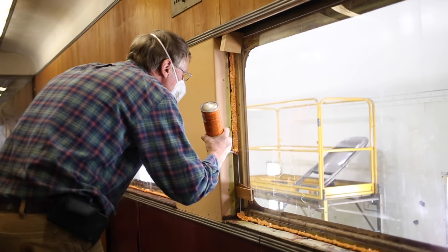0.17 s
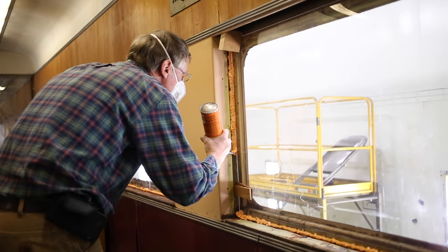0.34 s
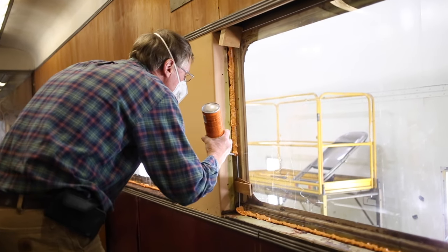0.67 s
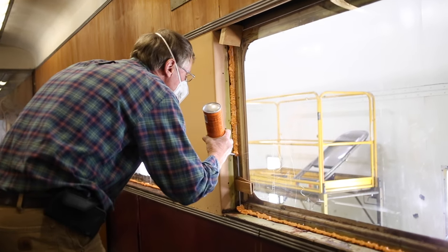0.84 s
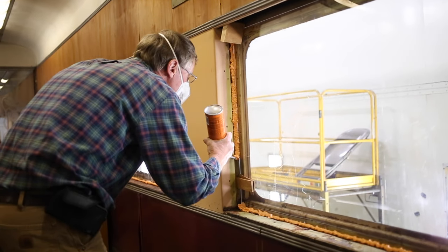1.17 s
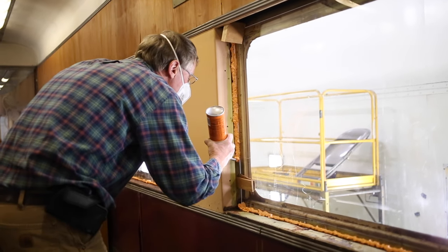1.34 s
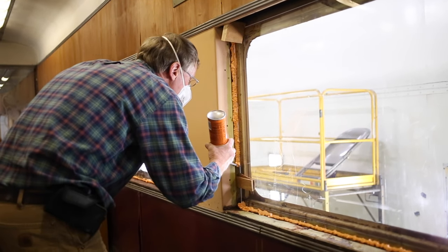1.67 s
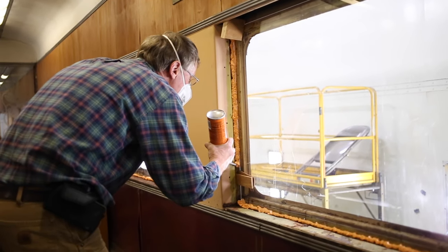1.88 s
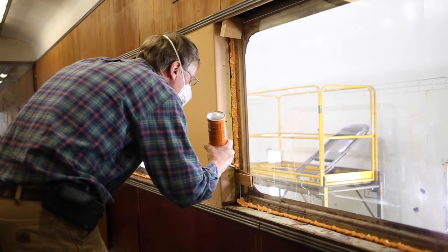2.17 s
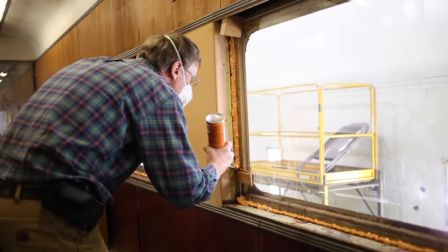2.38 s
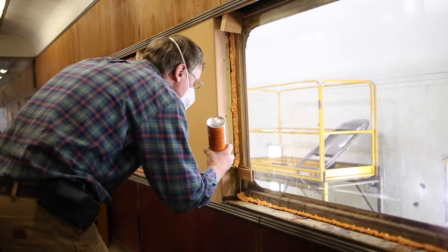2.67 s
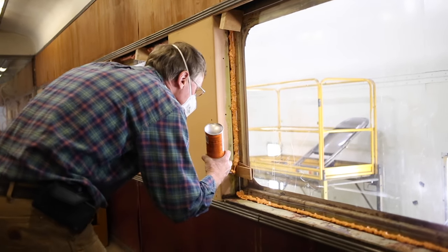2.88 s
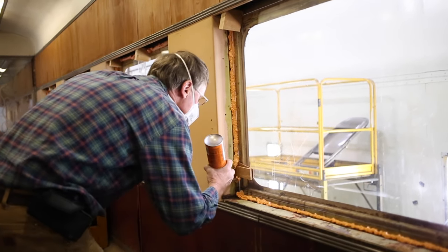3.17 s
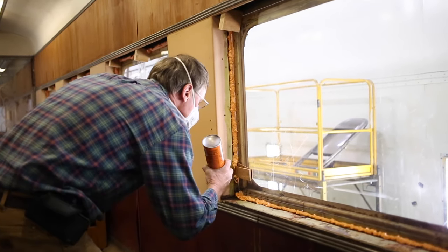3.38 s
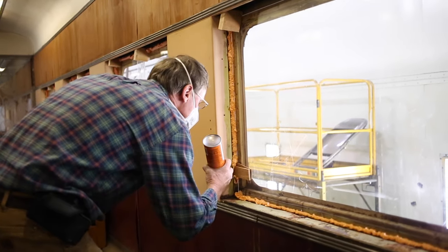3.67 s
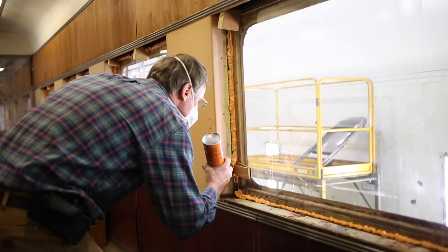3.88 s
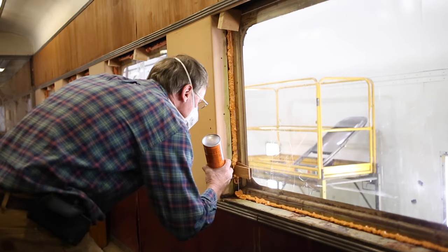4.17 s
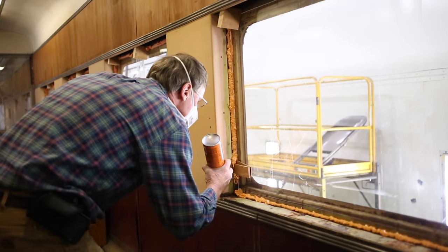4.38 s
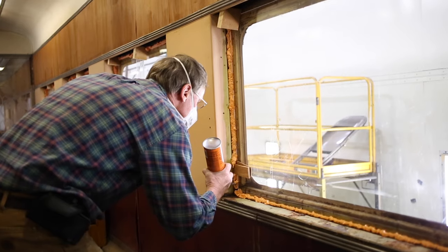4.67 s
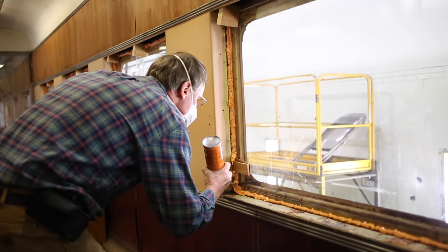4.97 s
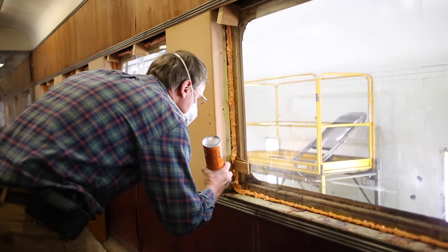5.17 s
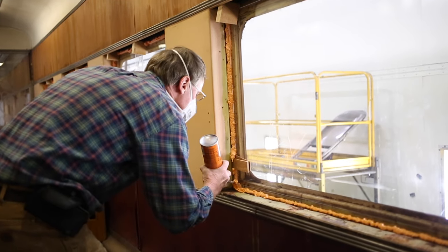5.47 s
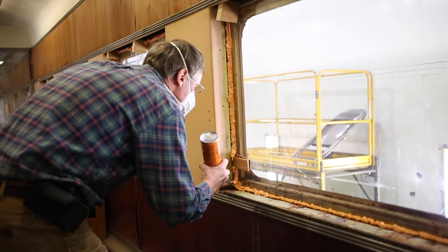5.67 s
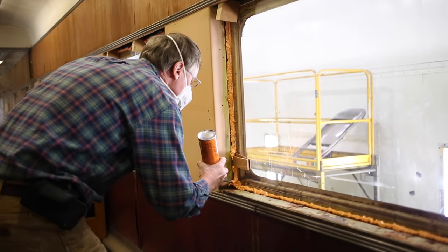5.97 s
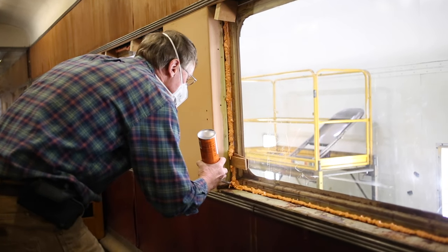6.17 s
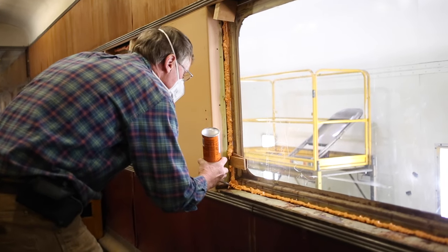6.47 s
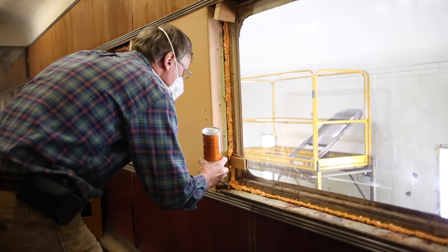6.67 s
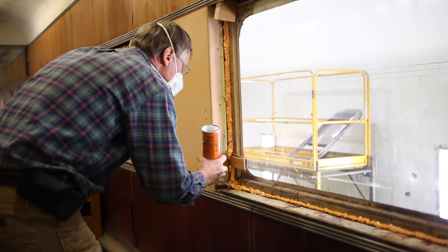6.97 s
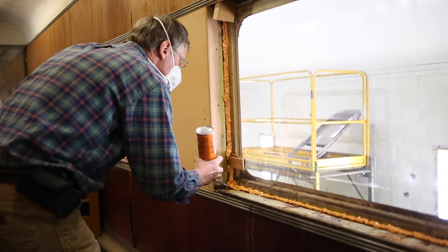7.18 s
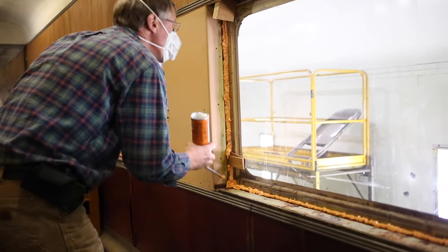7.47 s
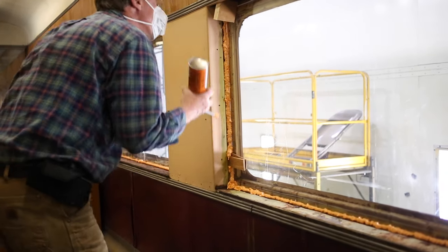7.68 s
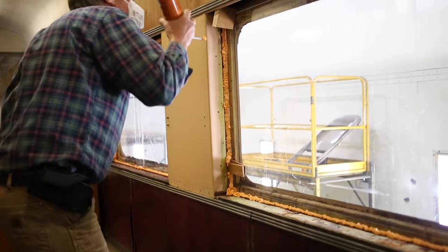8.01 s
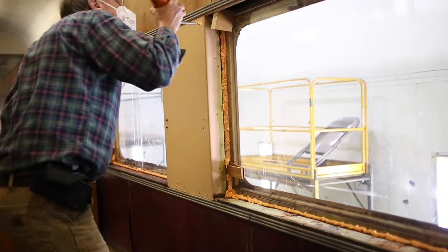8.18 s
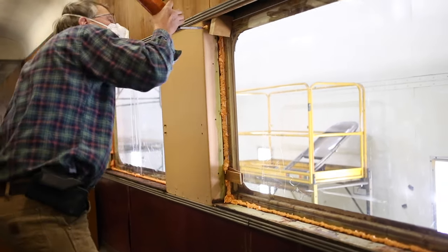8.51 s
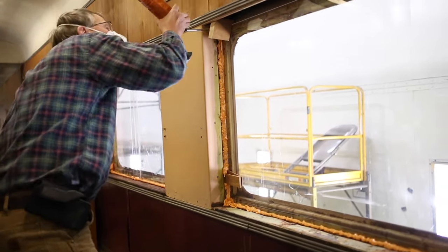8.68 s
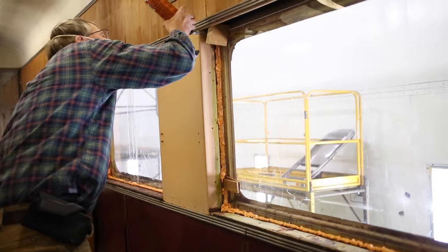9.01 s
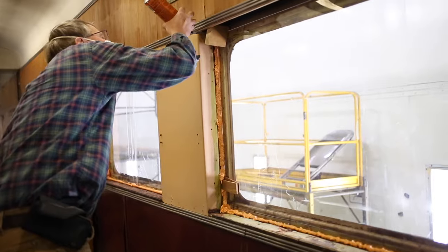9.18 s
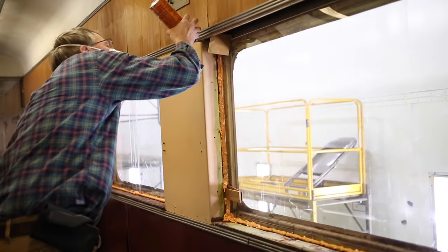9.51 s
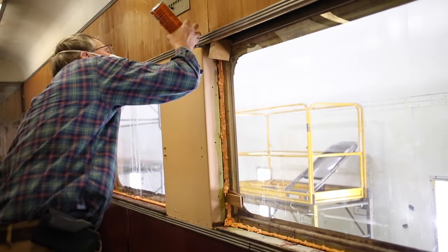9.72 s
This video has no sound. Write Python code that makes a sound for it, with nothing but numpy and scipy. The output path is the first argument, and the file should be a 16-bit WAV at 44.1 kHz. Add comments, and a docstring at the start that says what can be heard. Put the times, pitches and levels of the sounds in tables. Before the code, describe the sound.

An aerosol can squeezes out fizzing, squelching foam that turns to duller plops, then a sleeve rustles over workshop ventilation.

```python
"""Wet, sizzling foam sputters from an aerosol can into the gap beside a window, in a wood-panelled cabin.
Gas pockets burst at the straw and ring the gap, duller as the straw moves down, while propellant fizzes
and squeaks through pinholes. The nozzle spits in short spurts, big pockets plop, the can knocks lightly,
a sleeve rustles and the valve cracks open. Behind it all, the ventilation of the workshop around the
cabin hisses, hums and whines."""
import sys
import numpy as np
from scipy import signal
from scipy.fft import rfft, irfft, next_fast_len
from scipy.io import wavfile
from scipy.ndimage import uniform_filter1d

SR = 44100
rng = np.random.default_rng(int(sys.argv[2]) if len(sys.argv) > 2 else 0)


def unload_audio(sound):
    """Save the sound as a 16-bit wav file, at the path given as the first command line argument."""
    columns = np.transpose(np.atleast_2d(sound))
    # keep every value between -1 and 1, then stretch to whole-number steps
    steps = np.round(np.clip(columns, -1, 1) * 32767)
    wavfile.write(sys.argv[1], SR, steps.astype(np.int16))


N = 434369
T = np.arange(N) / SR

# the straw's path down the gap: time_s, depth (0 top, 0.3 upper, 1 middle, 2 and beyond bottom)
STRAW_PATH = [(0, 0), (.27, 0.5), (.42, -0.04), (1.05, 0.58), (1.45, 0.8), (2.3, 1.37), (3.2, 1.5),
              (7.3, 3)]
# resonances at the bottom of the gap: pitch_hz, width_hz, level_db
BOTTOM_MODES = [(636, 28, -6), (755, 54, 1.5), (792, 43, -1.5), (1009, 290, -7.5), (1120, 46, -9.5),
                (1276, 94, -2.5), (1576, 50, -7), (1800, 34, -9.5), (2060, 66, -12), (2447, 66, -9.5),
                (2830, 250, -16.5)]


def from_db(db):
    """Decibels to gain."""
    return 10 ** (np.asarray(db) / 20)


def rms_one(x):
    """Scale to rms 1."""
    return x / np.sqrt(np.mean(x ** 2) + 1e-20)


def even(x):
    """Hold the slow level at 1 and keep the fast grain."""
    return x / np.sqrt(np.maximum(uniform_filter1d(x * x, SR // 8), 1e-12))


def curve(rows):
    """Join (time_s, value) points into a value for every sample."""
    return np.interp(T, *np.transpose(rows))


def puff(start_s, hold_s, decay_s):
    """Envelope that opens at once, holds, then dies away."""
    return (T >= start_s) * np.exp(-np.clip((T - start_s - hold_s) / decay_s, 0, 40))


def swells(rows):
    """Envelope of bell-shaped swells, each (peak_s, half_width_s, level_db)."""
    powers = (from_db(db) ** 2 * np.exp(-np.minimum(2 * ((T - s) / width) ** 2, 60))
              for s, width, db in rows)
    return np.sqrt(sum(powers))


def drift(rate_hz):
    """Smooth random wander with a spread of 1."""
    step, settle = 40, 2000
    pole = np.exp(-2 * np.pi * rate_hz * step / SR)
    noise = rng.standard_normal(N // step + settle + 2)
    slow = signal.lfilter([1], [1, -2 * pole, pole * pole], noise)[settle:]
    return np.interp(np.arange(N) / step, np.arange(len(slow)), rms_one(slow))


def bursts(per_s, spread_db, clump_db, clump_hz):
    """Random clicks of uneven size that come in clumps."""
    sizes = from_db(spread_db * np.minimum(rng.exponential(1, N), 4) + clump_db * drift(clump_hz))
    return rms_one((rng.random(N) < per_s / SR) * rng.choice([-1, 1], N) * sizes)


def sputter(per_s, spread_db, decay_s):
    """Tiny puffs of noise at random, each starting sharply and dying away."""
    clicks = (rng.random(N) < per_s / SR) * from_db(spread_db * np.minimum(rng.exponential(1, N), 4))
    power = signal.lfilter([1], [1, -np.exp(-2 / (decay_s * SR))], clicks ** 2 + 1e-18)
    return rms_one(np.sqrt(power) * rng.standard_normal(N))


def colour(x, eq):
    """Equalise through (freq_hz, gain_db) points; rms 1."""
    size = next_fast_len(N)
    hz, db = np.transpose(eq)
    bins = np.maximum(np.fft.rfftfreq(size, 1 / SR), 1)
    gain = from_db(np.interp(np.log(bins), np.log(hz), db))
    return rms_one(irfft(rfft(x, size) * gain, size)[:N])


def band(x, low_hz, high_hz, order=3):
    """Butterworth band-pass."""
    sos = signal.butter(order, [low_hz, high_hz], "band", fs=SR, output="sos")
    return signal.sosfilt(sos, x + 1e-18)


def resonate(x, modes):
    """Parallel resonances, each (pitch_hz, width_hz, level_db)."""
    out = 0
    for hz, width, db in modes:
        r = np.exp(-np.pi * width / SR)
        poles = [1, -2 * r * np.cos(2 * np.pi * hz / SR), r * r]
        out = out + from_db(db) * (1 - r * r) / 2 * signal.lfilter([1, 0, -1], poles, x + 1e-18)
    return out


def cabin(x, wet_db, t60_s=0.27):
    """Direct sound plus dense reflections off the panels; the treble dies sooner."""
    t = T[:SR // 2]
    noise = rng.standard_normal(len(t))
    dull = signal.sosfilt(signal.butter(1, 4000, fs=SR, output="sos"), noise)
    tail = dull * from_db(-60 * t / t60_s) + (noise - dull) * from_db(-60 * t / (0.13 * t60_s))
    tail *= t > .003
    reflections = signal.fftconvolve(x, tail / np.linalg.norm(tail))[:N]
    wet = from_db(wet_db)
    return (x + wet * reflections) / np.sqrt(1 + wet ** 2)


def flow():
    """Gain of the foam's flow: each long trigger press, with a 0.1 s fade either side."""
    # one curve per press: time_s, level_db
    presses = [
        [(0.0, -26.5), (0.14, -27.5), (0.33, -29.5), (0.46, -30), (0.62, -29.5), (0.75, -31), (0.94, -29.5),
         (0.98, -27.5), (1.62, -28.5), (2.05, -25.5), (2.68, -38), (2.72, -42.5), (2.9, -47)],
        [(2.9, -55), (3.04, -41.5), (3.22, -47.5), (3.23, -39.5), (3.46, -40), (4.05, -34.5), (4.5, -33),
         (4.9, -26.5), (5.37, -38), (5.44, -51)],
        [(6.33, -48), (6.42, -38.5), (6.48, -35), (6.52, -35), (6.65, -31), (6.71, -33), (6.79, -31.5),
         (6.876, -43), (7.2, -46)],
    ]
    strength = 0
    for press in presses:
        inside_s = np.minimum(T - press[0][0], press[-1][0] - T)
        strength = strength + np.clip(1 + inside_s / 0.1, 0, 1) * from_db(curve(press))
    return strength


def pockets(depth, edge_hz):
    """Share the flow out as gains for large, medium and small gas pockets."""
    # wet spits, clusters of small pockets bursting at once: start_s, hold_s, level_db
    spits = [(0.099, 0.13, -32), (0.27, 0.075, -32), (2.1, .015, -39), (2.197, 0.019, -33),
             (2.519, 0.011, -36), (3.403, 0.012, -41), (3.59, .01, -33.5), (3.675, .01, -36.5),
             (3.745, .01, -42), (3.863, .02, -39), (4.018, .01, -39), (4.172, .02, -40), (4.38, .01, -38.5),
             (4.45, .01, -39), (6.43, 0.068, -42), (6.64, .015, -43), (6.74, 0.066, -40)]
    strength = flow()
    # a hard flow tears the foam finer, favouring medium pockets; depth favours large ones
    knee_db, open_hz, shut_hz = -34, 3320, 1960
    push_db = np.maximum(20 * np.log10(strength + 1e-9) - knee_db, 0)
    fineness = from_db(0.9 + 1.04 * push_db - depth)
    large = strength / np.sqrt(1 + fineness ** 2)
    # small pockets are smothered as the opening narrows
    shut = np.clip(np.log(open_hz / edge_hz) / np.log(open_hz / shut_hz), 0, 1)
    small = strength * from_db(-4.5 - 8.5 * shut)
    spitting = sum(from_db(db) * puff(s, hold, decay_s=0.035) for s, hold, db in spits)
    return large, large * fineness, np.hypot(small, spitting)


def hollow_ring(x, modes):
    """Each resonance applied twice: steep sides and dark valleys, as in a narrow tube."""
    return sum(resonate(resonate(x, [(hz, width, 0)]), [(hz, width, db)]) for hz, width, db in modes)


def gap(x, depth):
    """Ring the gap at the depth the straw has reached; it rings purer above the bottom."""
    # resonances higher up the gap: pitch_hz, width_hz, level_db
    top_modes = [(653, 150, -7.7), (727, 150, -7.2), (946, 83, -3.5), (1085, 150, -3), (1220, 56, -1.5),
                 (1326, 106, 0.5), (1663, 145, -2), (1841, 98, -0.5), (2124, 280, -5.0), (2449, 162, -4.2),
                 (2660, 109, -4.0), (3010, 248, -5.4), (3274, 45, -5.5), (3398, 329, -10.5)]
    upper_modes = [(625, 60, -4.5), (728, 78, -1.5), (834, 86, -1.9), (1055, 103, -1.5), (1203, 128, 0.5),
                   (1448, 195, -2), (1632, 50, -3), (1844, 127, 0.5), (2063, 180, -5.5), (2471, 91, -3.0),
                   (2690, 240, -7.8), (2947, 110, -4.5), (3121, 180, -9.2), (3464, 336, -11)]
    middle_modes = [(624, 110, -7), (747, 45, -2.0), (840, 100, -3.5), (1080, 110, -7.2), (1191, 154, 0.0),
                    (1423, 200, -0.9), (1517, 103, -8.1), (1877, 94, -7.1), (2200, 260, -7.5),
                    (2534, 250, -6.6), (2962, 78, -7.6), (3159, 120, -9), (3391, 110, -9.3),
                    (3695, 276, -13)]
    # depth at which each set rings alone: top, upper, middle, bottom
    mode_depths = (0, .3, 1, 2)
    shares = [np.interp(depth, mode_depths, row) for row in np.eye(len(mode_depths))]
    rings = [hollow_ring(x, modes) for modes in (top_modes, upper_modes, middle_modes)]
    rings.append(resonate(x, BOTTOM_MODES))
    return sum(share * rms_one(ring) for share, ring in zip(shares, rings)) + from_db(-19) * x


def muffle(x, edge_hz, q):
    """Foam closing the opening: a resonant low-pass with a moving edge."""
    out, state, block = np.zeros(N), np.zeros(2), 256
    for i in range(0, N, block):
        angle = 2 * np.pi * edge_hz[i] / SR
        damp, cosine = np.sin(angle) / (2 * q), np.cos(angle)
        zeros, poles = np.array([.5, 1, .5]) * (1 - cosine), [1 + damp, -2 * cosine, 1 - damp]
        out[i:i + block], state = signal.lfilter(zeros, poles, x[i:i + block], zi=state)
    return out


def foam():
    """Gas pockets burst in the wet foam and ring the gap; each size of pocket feeds its own register."""
    # upper edge of the sound that gets out past the foam: time_s, edge_hz
    opening = [(0, 5000), (2.0, 4470), (2.6, 3560), (3.9, 3130), (4.5, 2060), (4.88, 2100), (5.03, 1600),
               (5.15, 1190), (5.4, 1050), (6.3, 2300), (6.58, 2000), (6.78, 2490), (7.0, 1600)]
    depth, edge_hz = curve(STRAW_PATH), curve(opening)
    # a free flow sizzles densely; lower down it breaks into fewer, lumpier bursts
    lumpy = np.clip(depth / 2, 0, 1)
    pops = bursts(per_s=3800 - 2400 * lumpy, spread_db=2.5, clump_db=1.05 - 0.04 * lumpy, clump_hz=58)
    muffled = muffle(muffle(gap(pops, depth), edge_hz, q=1.2), edge_hz, q=1.2)
    deep = cabin(muffled, wet_db=-17)
    # small pockets burst nearer the surface and stay brighter
    crackle = gap(sputter(per_s=700, spread_db=1.7, decay_s=.004), depth)
    surface = cabin(muffle(crackle, np.maximum(edge_hz, 2500), q=1.1), wet_db=-15)
    body = from_db(-9.5 - 5.6 * lumpy) * even(band(pops, 229, 454, order=2))
    gurgle = even(band(deep, 585, 978)) + body
    squelch = even(band(deep, 1067, 2026, order=4))
    sizzle = even(band(surface, 2010, 3880, order=4))
    large, medium, small = pockets(depth, edge_hz)
    return large * gurgle + medium * squelch + small * sizzle


def fizz():
    """Bubbles and droplets crackle in escaping propellant and ring the straw; the spray fades with depth."""
    # tone of the spray: freq_hz, gain_db
    spray_eq = [(2400, -31), (3200, -14), (4200, 4.5), (6500, -4.5), (9000, -7.5), (12500, -18.5),
                (16000, -28)]
    # resonances of the straw: pitch_hz, width_hz, level_db
    straw_modes = [(4980, 280, -11), (6480, 180, -6), (9800, 340, -7)]
    # surges of propellant: peak_s, half_width_s, hiss_db, sizzle_db
    surges = [(0.36, 0.044, -47, -58), (0.76, 0.17, -33.5, -35), (1.26, 0.077, -38, -35),
              (1.335, 0.098, -32.5, -50), (1.65, 0.17, -32, -32), (1.79, 0.055, -34.5, -41),
              (4.95, 0.2, -51, -49.5)]
    grains = sputter(per_s=600, spread_db=3.0, decay_s=0.01)
    spray = even(colour(grains + resonate(grains, straw_modes), spray_eq))
    spray *= flow() * from_db(-9 - 3 * curve(STRAW_PATH))
    jet = sputter(per_s=330, spread_db=3.0, decay_s=0.0061)
    hiss = even(band(jet, 3000, 6400, order=2))
    hiss *= swells([(s, width, db) for s, width, db, _ in surges])
    sizzle = even(band(colour(jet, spray_eq), 6400, 14500))
    sizzle *= swells([(s, width, db) for s, width, _, db in surges])
    return spray + hiss + sizzle


def machine_tone(hz, wander_hz, flutter_db=0.7):
    """A sine that wavers a little in pitch and level; rms 1."""
    phase = 2 * np.pi * np.cumsum(hz + wander_hz * drift(5.36)) / SR
    return rms_one(np.sin(phase) * from_db(flutter_db * drift(1.4)))


def ventilation():
    """Air rushes through resonant ducts, with mains hum and motor whines."""
    # tone of the rushing air: freq_hz, gain_db
    air_eq = [(15, -66), (25, -14.5), (96, -10.5), (194, -8), (222, -7), (291, -8.5), (342, -5.5),
              (371, -7.5), (572, -13.5), (791, -10), (1120, -13), (2200, -12.5), (2520, -12), (8270, -17),
              (13000, -25), (15800, -38)]
    # duct resonances: pitch_hz, width_hz, level_db
    duct_modes = [(318, 14, -20), (740, 300, -2.5), (3160, 440, -3.5), (5870, 650, 1)]
    # steady machine tones: pitch_hz, level_db
    tones = [(372.8, -49.3), (743, -61.5), (2896, -64), (3644, -61), (5755, -61), (9701, -65), (11190, -66)]
    # swells of the hum, the high whine and the lower motor tone: peak_s, half_width_s, level_db
    hum_swells = [(1.4, 0.22, -53), (2.1, 0.21, -51), (3.8, 0.22, -55), (4.6, .18, -54), (6.9, 0.57, -52.5),
                  (9.3, 0.21, -55)]
    whine_swells = [(0.6, 0.6, -55), (2.68, .25, -50.5), (3.25, .2, -52), (4.75, .15, -50.5),
                    (5.22, 0.17, -52), (6.05, .5, -57), (7.3, 0.13, -54), (7.75, .2, -52), (9.5, .15, -65)]
    motor_swells = [(6.13, 0.24, -53.5), (7.5, 0.2, -55), (8.8, .3, -59), (9.45, 0.34, -52.5)]
    noise = rng.standard_normal(N)
    air = from_db(-39.5) * band(colour(noise + resonate(noise, duct_modes), air_eq), 41, 20000, order=2)
    steady = sum(from_db(db) * machine_tone(hz, wander_hz=1.184 + hz / 2000) for hz, db in tones)
    # each of these swells up from a constant floor
    hum = np.hypot(from_db(-60.5), swells(hum_swells)) * rms_one(np.sin(2 * np.pi * 100 * T))
    whine = np.hypot(from_db(-61), swells(whine_swells)) * machine_tone(8213, wander_hz=5, flutter_db=2)
    motor = np.hypot(from_db(-58.5), swells(motor_swells)) * machine_tone(2239.5, wander_hz=2.17)
    return air + steady + hum + whine + motor


def spurts():
    """Slugs of gas leave the straw with a crackling hiss and a hollow ring; the valve leaks thinly."""
    # spurts at the nozzle: start_s, hold_s, hiss_db, ring_db
    slugs = [(0.319, 0.013, -33.5, -53), (0.674, 0.035, -35, -56), (0.802, .006, -34, -56),
             (1.31, 0.041, -35, -54), (1.56, .005, -29, -55), (1.637, 0.01, -26, -54),
             (1.747, 0.018, -31, -55), (1.786, .008, -29.5, -54), (1.887, .005, -35, -52),
             (5.336, 0.016, -60, -40), (6.108, 0.017, -36, -39.5), (6.359, 0.0069, -52, -36),
             (6.409, .02, -39, -41), (7.382, 0.052, -40, -51), (9.398, 0.014, -54, -43)]
    # tone of their hiss: freq_hz, gain_db
    hiss_eq = [(300, -25), (800, 8.5), (2000, -1.5), (5000, 4.5), (9000, 1.5), (13000, -7), (16000, -39)]
    # leaks at the valve: start_s, hold_s, level_db
    leaks = [(2.79, .1, -51), (2.995, .03, -52), (3.08, .045, -53), (3.233, .03, -49), (6.103, 0.032, -37),
             (7.394, .04, -42.5), (9.414, .008, -44), (9.537, 0.0088, -31)]
    grains = even(sputter(per_s=710, spread_db=1.5, decay_s=.0015))
    hiss, hollow = colour(grains, hiss_eq), rms_one(resonate(grains, BOTTOM_MODES))
    nozzle = sum(puff(s, hold, decay_s=0.0057) * (from_db(hiss_db) * hiss + from_db(ring_db) * hollow)
                 for s, hold, hiss_db, ring_db in slugs)
    leak = even(band(sputter(per_s=980, spread_db=2.0, decay_s=.002), 8700, 14000))
    leak *= sum(from_db(db) * puff(s, hold, decay_s=0.022) for s, hold, db in leaks)
    return cabin(nozzle + leak, wet_db=-4.5)


def squeaks(width_hz=66):
    """Gas squeaks through pinholes in the foam, each ringing one narrow, sputtering pitch."""
    # pinhole squeaks: peak_s, half_width_s, pitch_hz, level_db
    pinholes = [(.48, .14, 6420, -47), (.7, 0.33, 4240, -43), (1.33, 0.037, 4120, -40),
                (1.34, 0.057, 5230, -44), (1.72, 0.16, 3680, -42), (1.66, 0.21, 5540, -46),
                (1.82, .15, 6390, -41), (1.95, 0.15, 4470, -43)]
    jet = sputter(per_s=700, spread_db=0.0, decay_s=.006)
    return sum(swells([(s, half_width, db)]) * even(resonate(jet, [(hz, width_hz, 0)]))
               for s, half_width, hz, db in pinholes)


def movement():
    """A sleeve rustles as the arm moves, weight shifts on the floor and the straw rubs the frame."""
    # sleeve rustles and straw rubs: peak_s, half_width_s, level_db
    rustles = [(2.95, 0.42, -49), (7.85, 0.3, -44.5), (8.34, 0.21, -42.5), (8.68, .22, -41.5),
               (9.35, 0.1, -51), (9.72, .1, -50)]
    rubs = [(9.305, .02, -45), (9.372, 0.026, -38)]
    # tone of the cloth: freq_hz, gain_db
    sleeve_eq = [(200, -5.5), (700, 5), (2000, 1), (5000, 0), (10000, -4.5), (16000, -17)]
    # soft thuds of shifting weight: start_s, hold_s, decay_s, level_db
    thuds = [(8.11, .03, .03, -55), (8.526, 0.025, 0.022, -40), (8.62, .025, 0.022, -47)]
    cloth = colour(bursts(per_s=5900, spread_db=3.0, clump_db=1.0, clump_hz=18), sleeve_eq)
    boom = even(band(rng.standard_normal(N), 89, 140, order=2))
    boom *= sum(from_db(db) * puff(s, hold, decay) for s, hold, decay, db in thuds)
    scrape = rms_one(band(sputter(per_s=600, spread_db=2.5, decay_s=0.0024), 1200, 2000, order=1))
    return cloth * swells(rustles) + scrape * swells(rubs) + boom


def plops():
    """Single blows ring the bottom of the gap, each trailing a splutter of smaller pockets."""
    # large pockets plop and the can knocks on the frame: start_s, level_db, upper_modes_db
    blows = [(3.11, -25, -11), (3.233, -23, -12), (3.27, -24, -13), (3.409, -27, -6), (3.51, -24, -12),
             (3.933, -16, 5), (3.985, -18, -12), (4.09, -16, 6), (4.262, -17.5, -2), (4.315, -26, -7),
             (4.364, -20.5, -6), (4.385, -16, 9), (4.504, -21, -14), (4.558, -15, 8), (4.62, -15, 5),
             (4.677, -17, 7), (4.742, -19, -5), (4.782, -24, 4), (4.837, -18, 10), (4.895, -18.5, -6),
             (4.954, -24, 6), (5.001, -18, 4), (5.044, -26, 5), (5.11, -17, -4), (5.184, -17, -2),
             (5.275, -23, -2), (5.347, -22.5, -15), (6.502, -18.5, -20), (6.545, -18, -3), (6.567, -24, 1),
             (6.59, -21, 3), (6.644, -23, 0), (6.656, -19, -4), (6.757, -23, 4), (6.878, -26, 3),
             (6.911, -25, 3), (6.95, -24, 1), (6.993, -22, -2), (7.095, -24.5, -4), (8.122, -23, 0),
             (9.111, -24.5, 1)]
    splutter_db, splutter_decay_s = -20, 0.0064
    out = np.zeros(N + SR)
    t = T[:SR // 10]
    for s, db, upper_db in blows:
        splutter = from_db(splutter_db) * rng.standard_normal(len(t)) * np.exp(-t / splutter_decay_s)
        # smaller pockets favour the upper resonances
        modes = [(hz, width, level + upper_db * (hz > 1000)) for hz, width, level in BOTTOM_MODES]
        ring = resonate(signal.unit_impulse(len(t)) + splutter, modes)
        start = round(s * SR)
        out[start:start + len(ring)] += from_db(db) * ring / abs(ring).max()
    return cabin(band(out[:N], 200, 5300, order=2), wet_db=-7.5)


def valve_snaps():
    """The trigger valve cracks open and rings the can."""
    # cracks of the valve: start_s, decay_s, level_db
    snaps = [(6.097, 0.0024, -27), (9.5376, 0.0079, -19)]
    # tone of the crack: freq_hz, gain_db
    crack_eq = [(300, -15), (550, -2), (800, 3), (1100, 2), (1800, -11), (2600, -4.5), (4500, -9.5),
                (8500, -6), (12000, -14), (16000, -19)]
    # resonances of the can: pitch_hz, width_hz, level_db
    can_modes = [(526, 45, -9), (785, 69, 14), (890, 90, -16), (1330, 60, -11), (2180, 41, 14),
                 (2300, 50, 1), (2860, 64, -8), (5670, 90, -17)]
    grit = sputter(per_s=7500, spread_db=1.0, decay_s=.0005)
    grit *= sum(from_db(db) * puff(s, 0, decay) for s, decay, db in snaps)
    crack = np.sqrt(np.mean(grit ** 2)) * colour(grit, crack_eq)
    blows = np.zeros(N)
    for s, _, db in snaps:
        blows[round(s * SR)] = from_db(db)
    ring = resonate(blows, can_modes)
    ring *= from_db(-2) * blows.max() / abs(ring).max()
    return cabin(crack + ring, wet_db=-10)


def scene():
    """The foam, the can and the handling, close up in mono over the ventilation."""
    spraying = foam() + fizz() + squeaks() + spurts() + valve_snaps() + plops()
    return (spraying + movement() + ventilation())[None]


def record(dry):
    """The top is cut, and the sound stops abruptly just before the end."""
    cutoff_hz, end_s = 15700, 9.769
    return signal.sosfilt(signal.ellip(10, .1, 80, cutoff_hz, fs=SR, output="sos"), dry * (T < end_s))


dry = scene()
out = record(dry)
unload_audio(out)
```